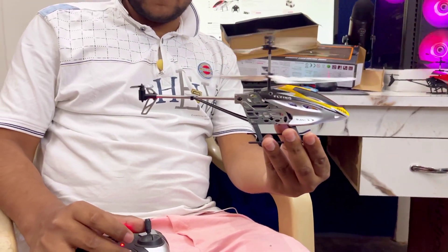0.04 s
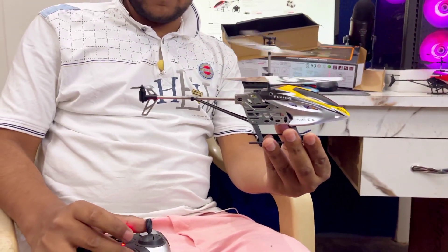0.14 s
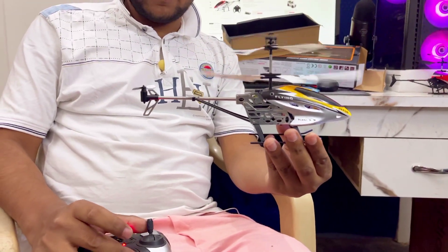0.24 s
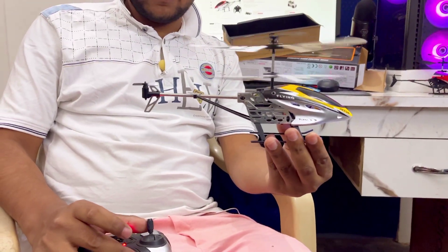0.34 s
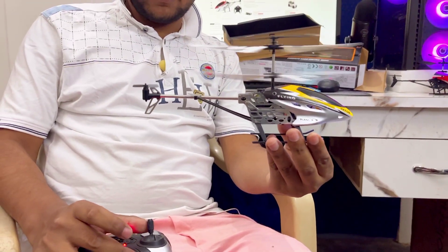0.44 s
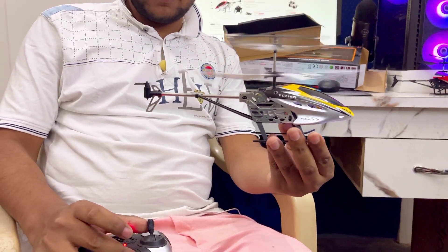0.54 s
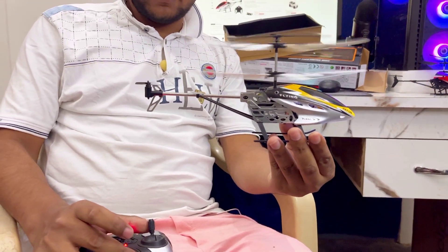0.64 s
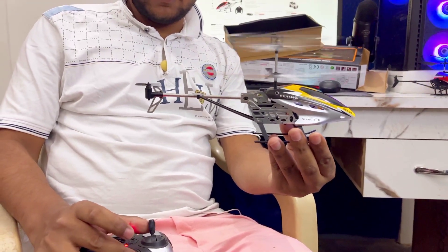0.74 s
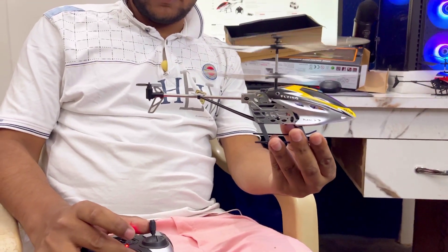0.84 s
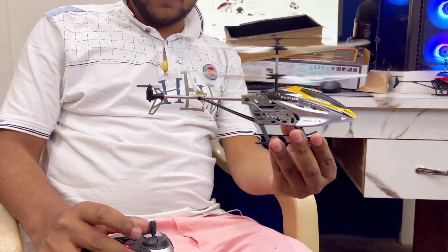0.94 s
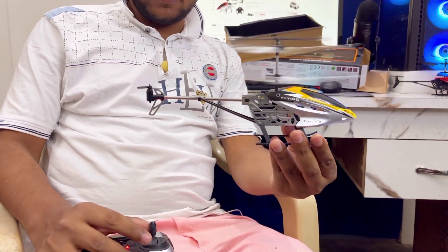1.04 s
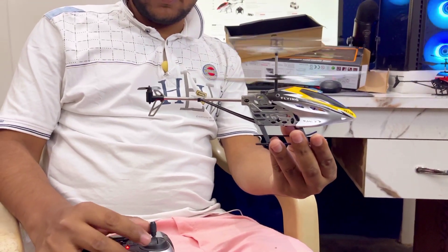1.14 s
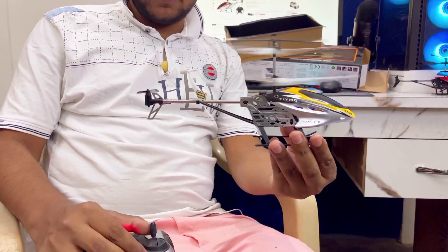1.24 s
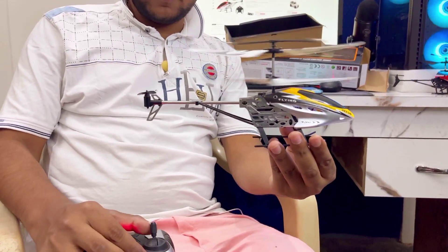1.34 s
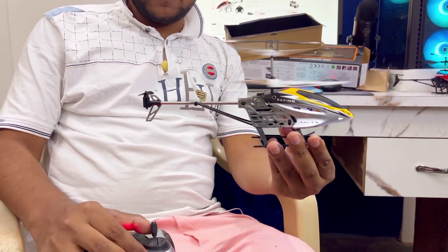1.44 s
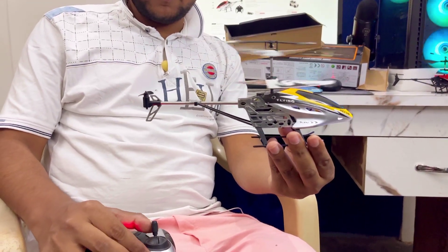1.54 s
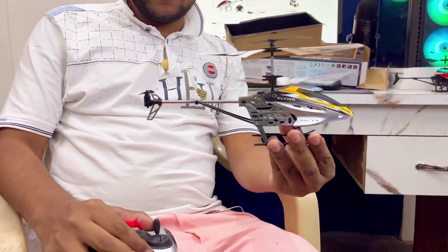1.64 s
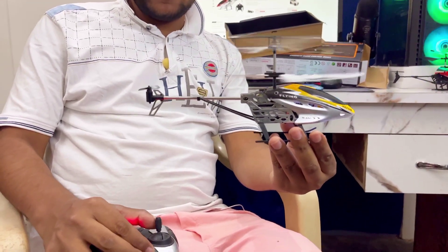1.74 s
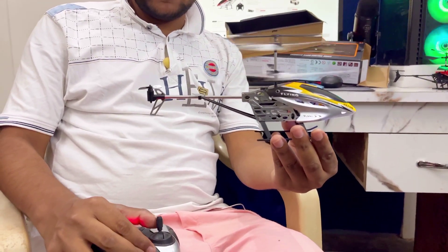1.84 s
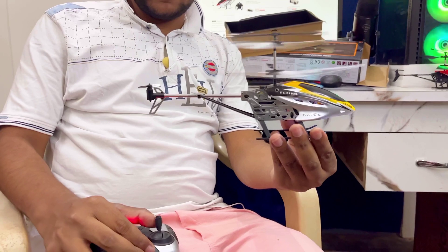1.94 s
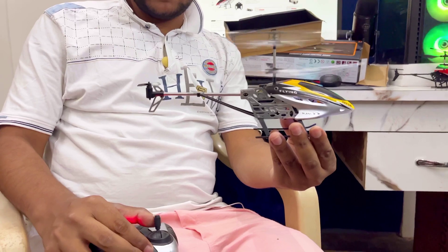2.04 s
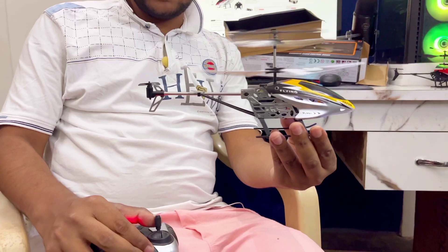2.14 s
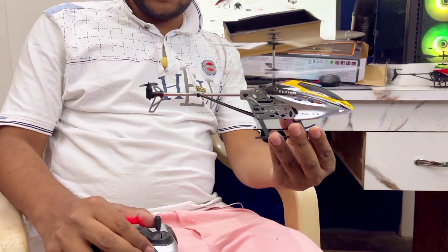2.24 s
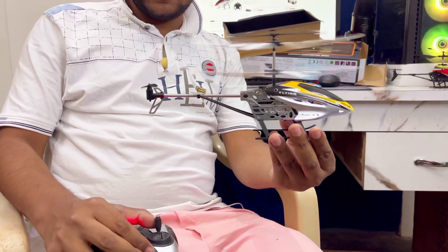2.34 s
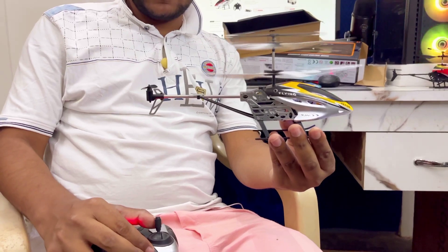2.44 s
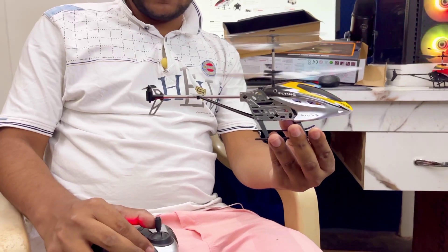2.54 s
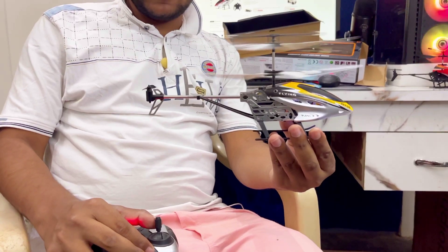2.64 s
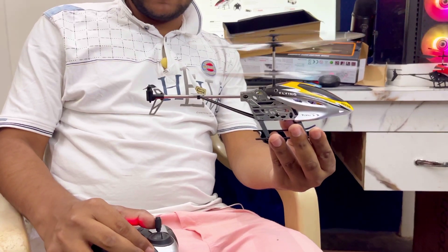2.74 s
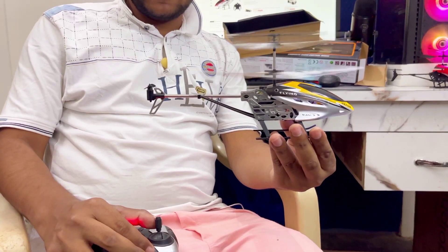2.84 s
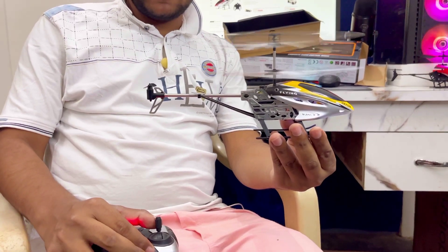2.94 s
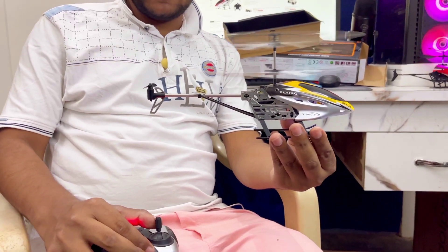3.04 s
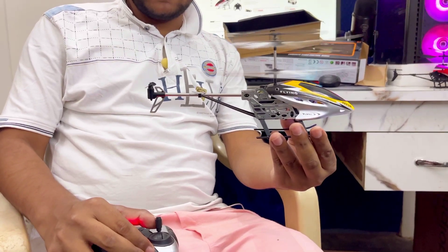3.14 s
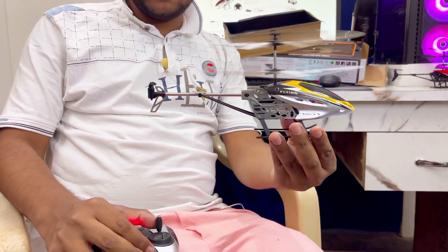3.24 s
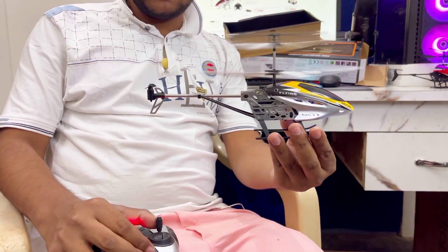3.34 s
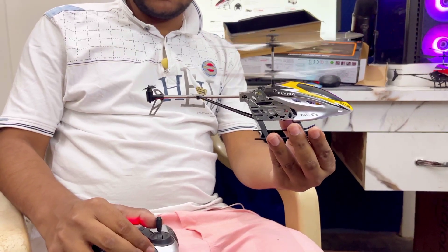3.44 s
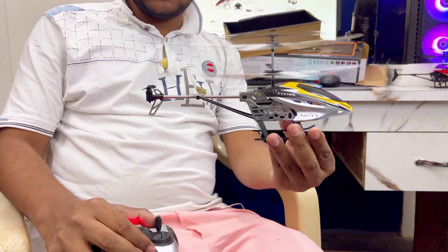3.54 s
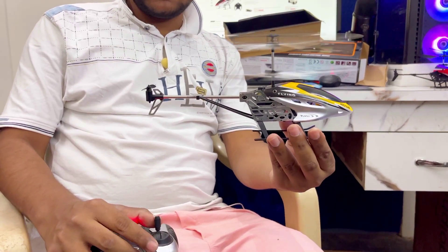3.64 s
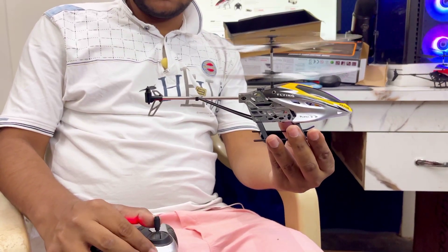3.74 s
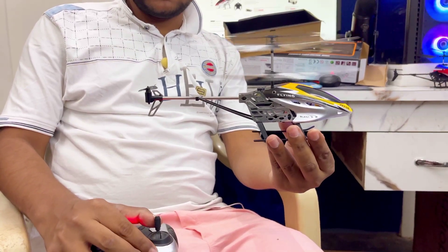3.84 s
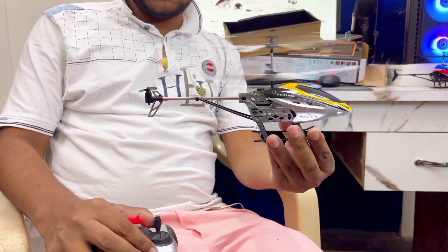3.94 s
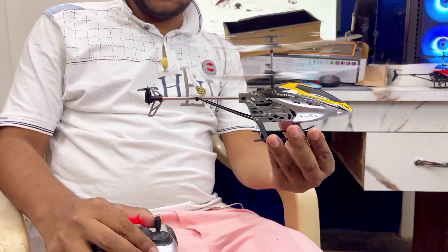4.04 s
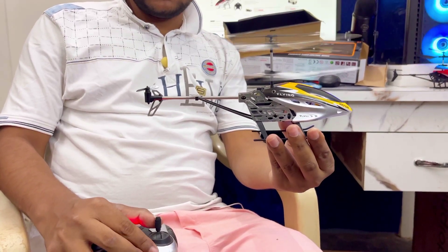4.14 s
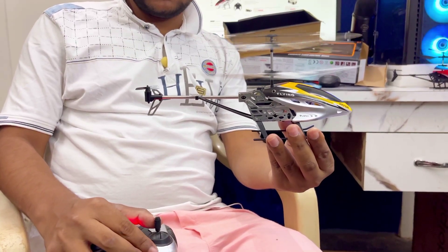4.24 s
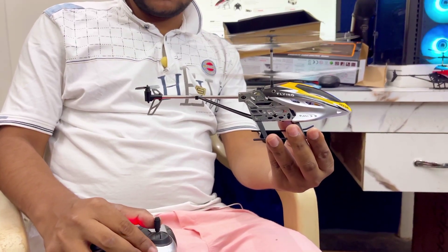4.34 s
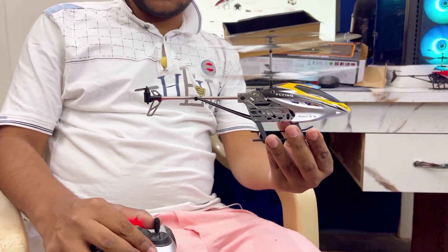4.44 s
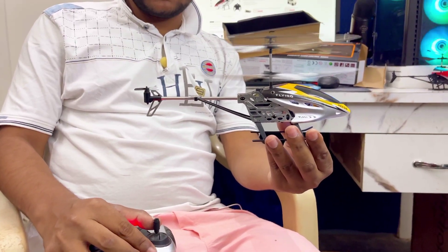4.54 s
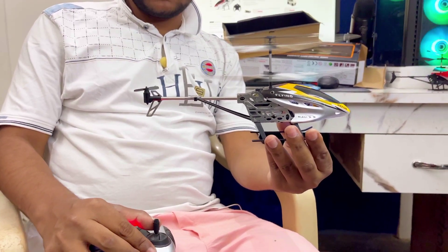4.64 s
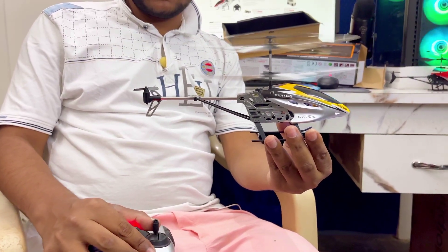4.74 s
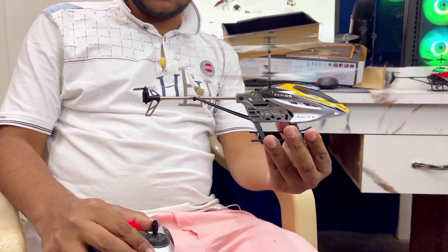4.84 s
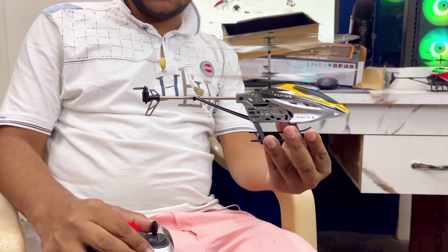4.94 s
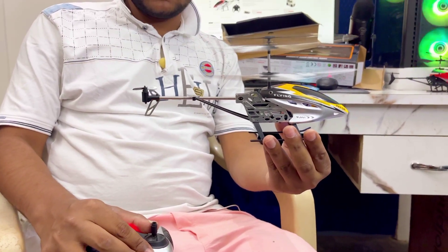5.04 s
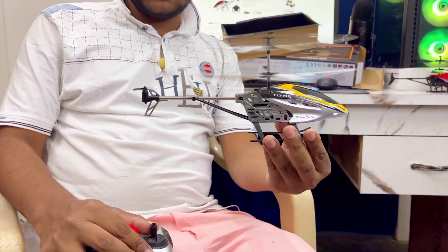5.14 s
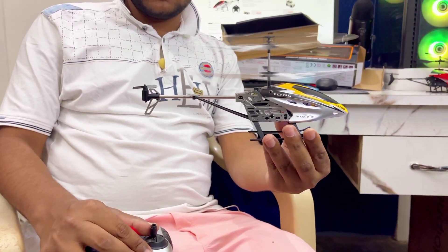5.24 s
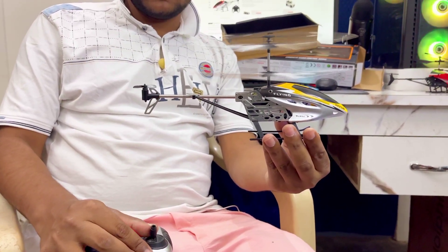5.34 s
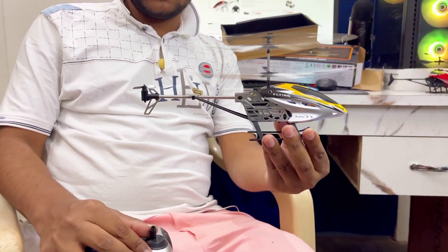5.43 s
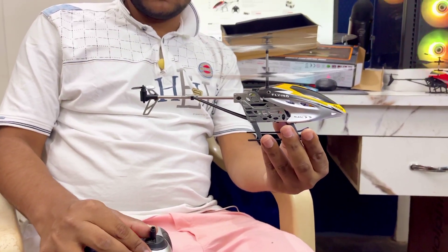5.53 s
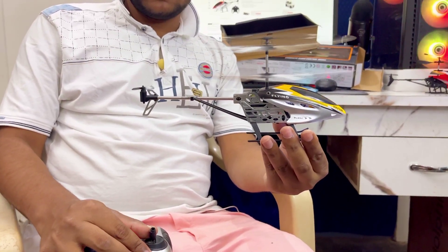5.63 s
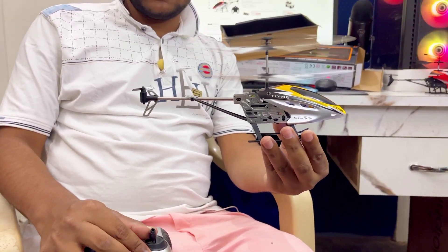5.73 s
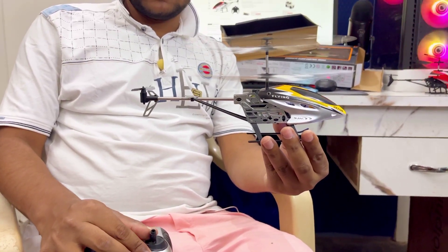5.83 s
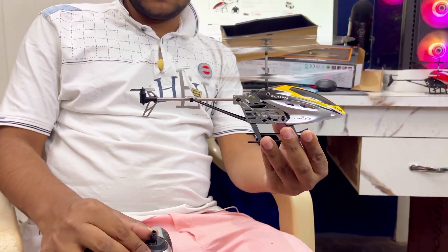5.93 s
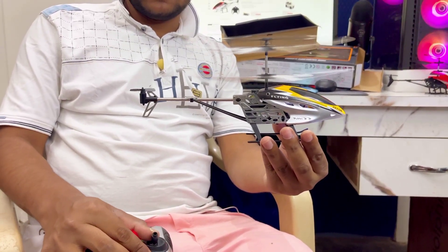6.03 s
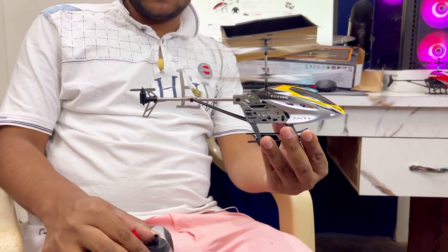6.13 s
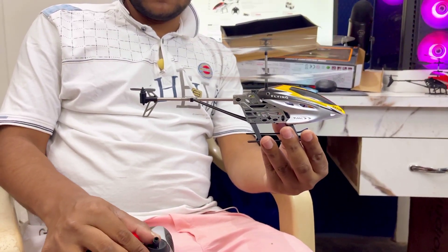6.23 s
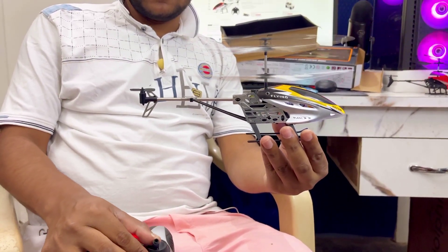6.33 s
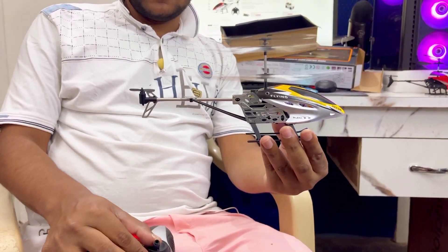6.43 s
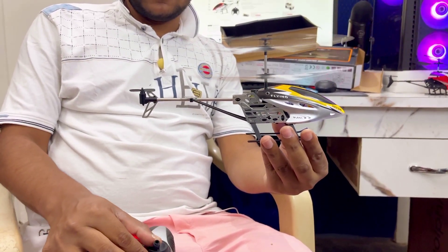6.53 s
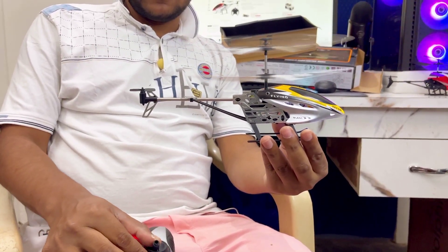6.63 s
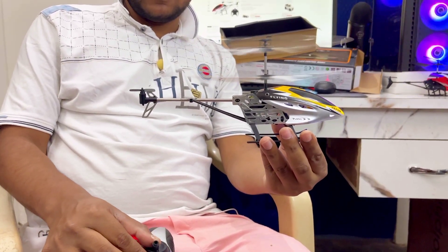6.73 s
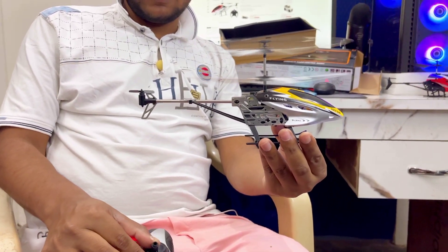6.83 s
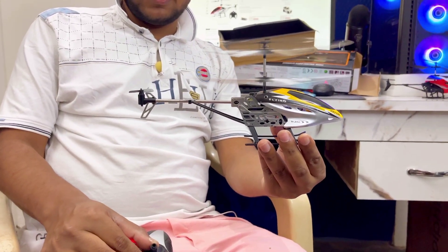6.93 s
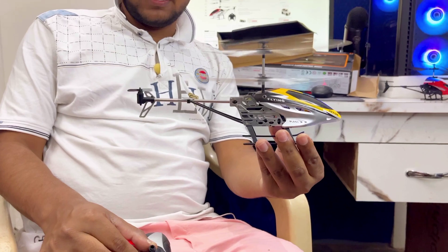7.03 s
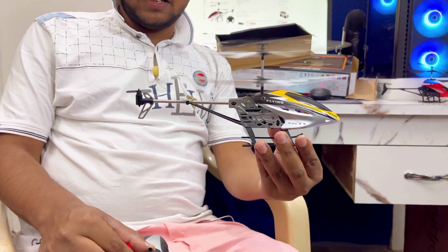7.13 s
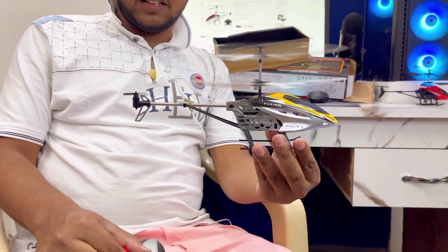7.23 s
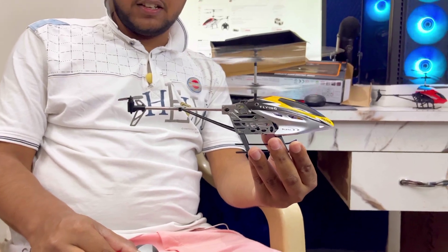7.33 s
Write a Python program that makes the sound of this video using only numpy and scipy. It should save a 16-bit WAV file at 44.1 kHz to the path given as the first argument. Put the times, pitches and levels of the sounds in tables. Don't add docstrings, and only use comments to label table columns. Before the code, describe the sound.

Tiny gears whine and rattle as a hand-held toy helicopter revs briefly, dips, then climbs to a high buzzing drone with rushing rotor air.

```python
import sys
import numpy as np
from scipy import signal
from scipy.fft import rfft, irfft, next_fast_len
from scipy.io import wavfile
from scipy.ndimage import uniform_filter1d, map_coordinates

SR = 44100
rng = np.random.default_rng(int(sys.argv[2]) if len(sys.argv) > 2 else 0)


def elevation(decibels):
    levels = np.asarray(decibels, float)
    return 10 ** (levels / 20)


def generate_wav(sig):
    pcm = np.round(np.clip(np.atleast_2d(sig).T, -1, 1) * 32767).astype(np.int16)
    wavfile.write(sys.argv[1], SR, pcm)


N = 325458
PADDED = next_fast_len(N + SR)
HZ = np.maximum(np.arange(PADDED // 2 + 1) * SR / PADDED, 1)

# t/s, level/dB
EFFORT = [(0, -51.5), (.09, -58), (.195, -83), (.235, -46.5), (.33, -43), (.42, -38.5), (1.2, -39.5),
          (1.4, -48), (1.55, -57.5), (1.6, -68), (1.645, -48), (1.72, -43), (1.86, -38), (2.55, -36),
          (3.0, -33.5), (4.0, -32.5), (4.5, -31), (7.38, -31.5)]
# t/s, fast motor teeth f/Hz, slow motor teeth f/Hz
BLIP = [
    (0, 852, 711),
    (0.21, 638, 530),
    (0.35, 1320, 1041),
    (0.48, 2026, 1490),
    (0.6, 2315, 1815),
    (0.73, 2365, 1950),
    (1.17, 2375, 2011),
    (1.28, 2290, 1910),
    (1.62, 897, 750),
]
# t/s, fast motor teeth f/Hz, slow motor teeth f/Hz
SPOOL = [(1.74, 1191, 1046), (1.87, 1981, 1544), (2.02, 2551, 2030), (2.17, 2750, 2300), (2.6, 2955, 2567),
         (2.8, 3167, 2776), (3.2, 3469, 3091), (3.48, 3560, 3212), (4.05, 3528, 3180), (4.2, 3768, 3347),
         (4.3, 3825, 3440), (4.65, 3925, 3503), (4.82, 4028, 3590), (5.05, 4095, 3626), (5.25, 4314, 3837),
         (5.4, 4352, 3892), (6.5, 4343, 3868), (7.38, 4338, 3852)]
# from t/s, to t/s
THROTTLE = [
    (0.21, 1.2),
    (1.62, 8.2),
]
COAST_DB = -12
KICK_DB, KICK_S = 5.5, .07
INERTIA_S = .03
PINION_TEETH = 8
TEETH_PER_BLADE = 42
FULL_SPEED_HZ = 4350

SHAFT_ORDERS = [1, 3, 4, 5, 6, 7, 9, 12, 15, 24]
FAST_ORDERS_DB = [-22, -60, -60, -24, -21.5, -24, -21, -27, -24, -29]
SLOW_ORDERS_DB = [-21, -34, -29, -33, -36, -27, -30, -29, -27, -36]
MESH_PATH = [(1200, -9), (1750, -6), (1990, 10), (2180, -16), (2450, -22), (2780, -8), (3340, -2.5),
             (4300, -2.5)]
DOUBLE_PATH = [(2800, -22), (3350, -1), (3800, -18), (5700, -18), (6400, -10), (7100, -6.5), (7350, -16),
               (8700, -11)]
HALF_PATH = [(900, -29), (1400, -20), (1650, -21), (1820, -18), (1920, 9), (2040, 9), (2075, -6),
             (2200, -17)]
THIRD_PATH = [(600, -60), (890, -26), (1050, -23), (1200, -22), (1330, -12.5), (1470, -10.5), (1520, -14.5),
              (1630, -25)]
SLOW_MESH_PATH = [(1100, -14), (1370, -2), (1600, -18), (1990, 2), (2200, -17), (2900, -15), (3450, -3),
                  (3880, -4.5)]
SLOW_DOUBLE_PATH = [(2800, -24), (3300, -10), (3600, -18), (3980, -6), (4400, -18), (6400, -14),
                    (7300, -15), (7770, -9)]
# f/Hz, level/dB
WHINE_COLOUR = [(250, -14), (450, 0), (1000, -12), (1500, -2), (2500, -2), (4300, 0), (7000, -1),
                (11000, 0), (13000, 3)]
# f/Hz, width/Hz, lift/dB
FRAME = [(1413, 48, 15), (1708, 50, 11.5), (1960, 16, 10.5), (3330, 16, 11.5), (6670, 730, 10.5),
         (7600, 190, 2.5), (10850, 460, 9)]
# f/Hz, width/Hz, level/dB
RING = [(1933, 48, 7), (2034, 86, 7.5), (2030, 170, -8), (1348, 95, 0)]
RING_DB = -11.5
# f/Hz, level/dB per Hz
RATTLE = [(500, -14), (900, -40), (1300, -15.5), (2000, -9.5), (2650, -8), (3500, -2), (4630, -2.5),
          (6610, -2), (7600, -1.5), (8500, 1), (9500, 0.5), (10900, -6), (12300, -5.5), (13900, -10)]

BEAT_PAIRS = [(1, 0), (0, 1), (1, 1), (2, 2), (3, 3), (.5, 0), (2, 0), (0, 2), (4, 4), (5, 5)]
BEATS_DB = [-49, -52, -51, -57, -60, -61, -62, -62, -61, -68]
# f/Hz, level/dB per Hz
DOWNWASH = [(30, -22), (60, 7), (150, -20.5), (330, -8), (480, -2.5), (850, 1), (1200, -4.5), (2500, -22.5)]
BEAT_POWER = 3.0
WASH_DB, WASH_POWER = -47.5, 2.9

# f/Hz, width/Hz, lift/dB
ROOM_MODES = [(52, 4, 10), (76, 6, 8), (84, 5, 11), (92.5, 4, 8), (104, 5, 8), (142, 20, 9), (160, 6, 11),
              (173, 5, 19), (196, 8, 9), (392, 14, 5), (416, 6, 16), (482, 14, 15), (588, 12, 7)]
ROOM_T60_S, ROOM_DB = .3, -7
# f/Hz, level/dB per Hz
ROOM_TONE = [(40, -0.5), (150, -5), (300, -6), (500, -8.5), (900, -11), (1570, -6), (2040, -8.5),
             (2840, -8.5), (7750, -20), (14000, -47)]
ROOM_TONE_DB = -48
# f/Hz, peak level/dB
HUM = [(132, -59), (150, -60), (176, -62), (203, -72.5)]

# f/Hz, share in common (0 to 1)
LIKENESS = [(100, 0.99), (250, 0.7), (690, 0.032), (1700, 0.39), (3300, 0.71), (5000, 0.017), (6600, 0.17),
            (7600, 0.18), (8500, 1), (9700, 0.061), (10500, 0.8), (11200, 1), (12600, 0.83), (13500, 0.11),
            (14000, 0.23)]
# f/Hz, phase/rad
LEAD = [(600, 0.5), (2100, 0.5), (3000, 1.5), (3900, 1.26), (4300, 0.66), (7000, 0.66), (7900, -2),
        (8900, -2.5), (10500, -7), (11000, -2 * np.pi)]
# f/Hz, level/dB
LEAN = [(60, 0.3), (120, -0.3), (240, -0.5), (470, 0.5), (920, -0.5), (1830, -1.5), (3620, -2), (7180, 2),
        (14200, -0.5)]
CUTOFF_HZ = 13770


def gears(fast_hz, slow_hz, rattle_db, coast_db):
    fast = phase(fast_hz)
    whine_db = rattle_db + coast_db
    fast_mesh_db = whine_db + at_hz(MESH_PATH, fast_hz) - 1.5
    fast_double_db = rattle_db + at_hz(DOUBLE_PATH, 2 * fast_hz) + 2.5
    shaft, fast_mesh, fast_orders = whine(fast, fast_mesh_db, fast_double_db, FAST_ORDERS_DB, rattle_db, wobble=0.12)

    slow_mesh_db = whine_db + at_hz(SLOW_MESH_PATH, slow_hz) - 2.5
    slow_double_db = rattle_db + at_hz(SLOW_DOUBLE_PATH, 2 * slow_hz) + 2.5
    _, slow_mesh, slow_orders = whine(phase(slow_hz), slow_mesh_db, slow_double_db,
                                      SLOW_ORDERS_DB, rattle_db, wobble=0.75)

    wheel_swell = 1 + 0.29 * np.cos(fast / TEETH_PER_BLADE / 2)
    half_db = rattle_db + at_hz(HALF_PATH, fast_hz / 2) - 4.5
    half = elevation(half_db + 2.0 * drift(21)) * wheel_swell * np.sin(fast / 2)
    third_db = rattle_db + at_hz(THIRD_PATH, fast_hz * 3 / PINION_TEETH) - 1
    third = elevation(third_db + 1.5 * drift(8)) * np.sin(3 * shaft)

    colour = elevation(at_hz(WHINE_COLOUR)) * np.sqrt(1 + bumps(FRAME))
    orders = filtered(fast_orders + slow_orders, colour)
    radiated = np.sqrt(1 + 0.081 * bumps(FRAME)) / (1 + (1200 / HZ) ** 8)
    mesh = filtered(fast_mesh + slow_mesh, radiated)
    return in_room(mesh + half + third + orders, ROOM_DB)


def whine(teeth, mesh_db, double_db, orders_db, rattle_db, wobble):
    wheel = teeth / TEETH_PER_BLADE / 2
    sway = wobble * np.sin(wheel) / PINION_TEETH
    shaft = teeth / PINION_TEETH + sway + .065 * drift(45)
    swell = 1 + 0.23 * np.cos(wheel + 1.3)
    mesh = elevation(mesh_db + 2.4 * drift(40)) * np.sin(PINION_TEETH * shaft)
    light_db = np.minimum(rattle_db + 31, 0)
    mesh += elevation(double_db + light_db + 3.5 * drift(35)) * np.sin(2 * PINION_TEETH * shaft)
    orders = 0
    for order, db in zip(SHAFT_ORDERS, orders_db):
        orders = orders + elevation(db + 3.5 * drift(8)) * np.sin(order * shaft + 6 * rng.random())
    return shaft, swell * mesh, elevation(rattle_db) * orders


def rattle(fast, slow, rattle_db, ring_db):
    shaft_turns = np.cos(fast / PINION_TEETH) + np.cos(slow / PINION_TEETH)
    wheel_turns = np.cos(fast / TEETH_PER_BLADE / 2)
    pulse = 1 + 0.068 * shaft_turns + 0.048 * wheel_turns
    gate = pulse * elevation(0.32 * drift(8.1) + 0.53 * drift(70))
    broad = hiss(elevation(at_hz(RATTLE)) * np.sqrt(1 + 0.34 * bumps(FRAME)), gate)
    ring = hiss(bumps(RING), elevation(1.6 * drift(25)))
    ring_level = elevation(0.43 * (rattle_db + 29.5) - 27 + ring_db)
    return elevation(rattle_db + 4.5) * broad + ring_level * ring


def throttle():
    t = np.arange(N) / SR
    driven, kick_db = np.zeros(N), np.zeros(N)
    for start, stop in THROTTLE:
        driven += (t > start) & (t < stop + .05)
        kick_db += KICK_DB * (t > start) * np.exp(-np.abs(t - start) / KICK_S)
    coasting = 1 - uniform_filter1d(driven, SR // 20, mode="nearest")
    return COAST_DB * coasting, kick_db


def rotors(fast_hz, slow_hz):
    speed_db = 20 * np.log10(fast_hz / FULL_SPEED_HZ)
    tones = 0
    for (upper, lower), db in zip(BEAT_PAIRS, BEATS_DB):
        hz = (upper * fast_hz + lower * slow_hz) / TEETH_PER_BLADE
        lift = np.sqrt(1 + bumps(ROOM_MODES, hz[::16])).repeat(16)[:N]
        gusts_db = 1.1 * drift(3)
        level = elevation(db + 1.0 + BEAT_POWER * speed_db + gusts_db)
        tones = tones + level * lift * np.sin(phase(hz) + 6 * rng.random())
    blades = in_room(tones, ROOM_DB - 13)
    wash = hiss(elevation(at_hz(DOWNWASH)), elevation(1.2 * drift(6)))
    return blades + elevation(WASH_DB + 7 + WASH_POWER * speed_db) * wash


def room_tone():
    t = np.arange(N) / SR
    hum = 0
    for hz, db in HUM:
        hum = hum + elevation(db - 1.5 + 2.3 * drift(2.05)) * np.sin(2 * np.pi * hz * t)
    return elevation(ROOM_TONE_DB) * hiss(elevation(at_hz(ROOM_TONE))) + hum


def in_room(tone, room_db):
    t = np.arange(SR // 2) / SR
    decay = elevation(-60 * t / ROOM_T60_S) * (t > .004)
    echoes = rms_one(rng.standard_normal((2, len(t))) * decay)
    wet = elevation(room_db) * rfft(echoes, PADDED) / np.sqrt(len(t)) / (1 + (HZ / 9000) ** 8)
    return filtered(tone, wet + port_turn())


def hiss(gain, gate=1):
    white = rfft(gate * rng.standard_normal((3, N)), PADDED) * gain
    alike = np.clip(at_hz(LIKENESS), 0, 1)
    pair = np.sqrt(alike) * white[0] + np.sqrt(1 - alike) * white[1:]
    return rms_one(irfft(pair * port_turn(), PADDED)[:, :N])


def port_turn():
    turn = np.exp(.5j * at_hz(LEAD)) * elevation(at_hz(LEAN) / 2)
    return np.array([turn, 1 / turn])


def filtered(x, response):
    return irfft(rfft(x, PADDED) * response, PADDED)[..., :N]


def bumps(modes, hz=HZ):
    return sum(elevation(2 * db) / (1 + (2 * (hz - centre) / width) ** 2) for centre, width, db in modes)


def at_hz(points, hz=HZ):
    table_hz, values = np.transpose(points)
    return np.interp(np.log(hz), np.log(table_hz), values)


def in_time(rows):
    s, *columns = np.transpose(rows)
    return [np.interp(np.arange(N) / SR, s, column) for column in columns]


def phase(hz):
    return 2 * np.pi * np.cumsum(hz) / SR


def drift(rate):
    knots = rng.standard_normal(1000)
    places = 3 + np.arange(N // 64 + 2) * 64 / SR * min(rate, 120)
    coarse = map_coordinates(knots, [places], order=2)
    return np.interp(np.arange(N) / 64, np.arange(len(coarse)), coarse)


def rms_one(x):
    return x / np.sqrt(np.mean(x ** 2) + 1e-20)


def scene():
    fast_hz, slow_hz = uniform_filter1d(in_time(BLIP + SPOOL), int(INERTIA_S * SR), mode="nearest")
    rattle_db = in_time(EFFORT)[0] + 3.76
    coast_db, kick_db = throttle()
    whines = gears(fast_hz, slow_hz, rattle_db, coast_db)
    chatter = rattle(phase(fast_hz), phase(slow_hz), rattle_db, RING_DB + kick_db)
    return whines + chatter + rotors(fast_hz, slow_hz) + room_tone()


def band_limit(x):
    return signal.sosfilt(signal.butter(12, 14820, fs=SR, output="sos"), x)


def record(dry):
    low_cut = signal.butter(8, 46, "high", fs=SR, output="sos")
    top_edge = signal.ellip(14, .5, 60, CUTOFF_HZ, fs=SR, output="sos")
    mix = signal.sosfilt(top_edge, signal.sosfilt(low_cut, dry))
    return band_limit(mix)


dry = scene()
out = record(dry)
generate_wav(out)
```